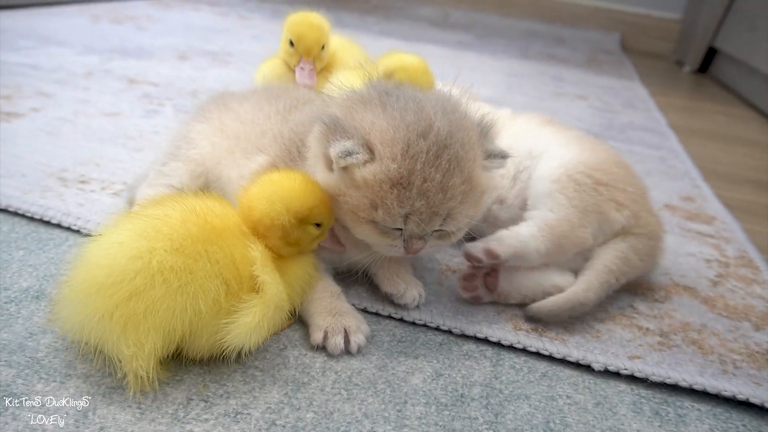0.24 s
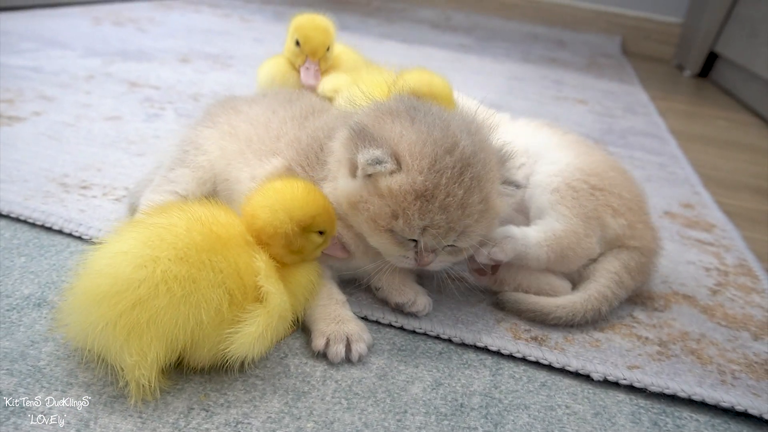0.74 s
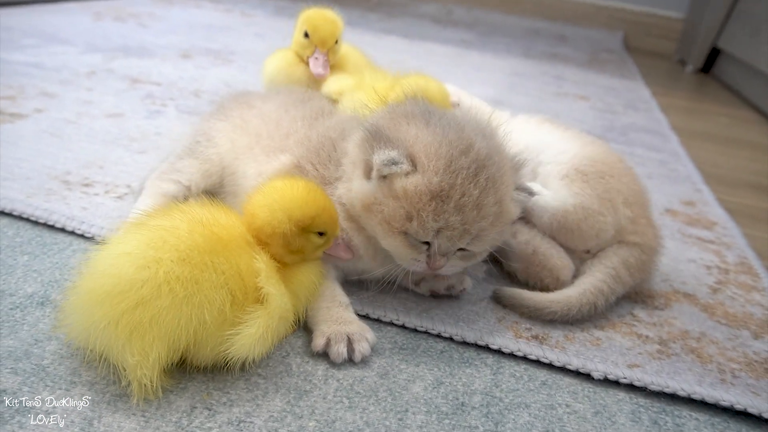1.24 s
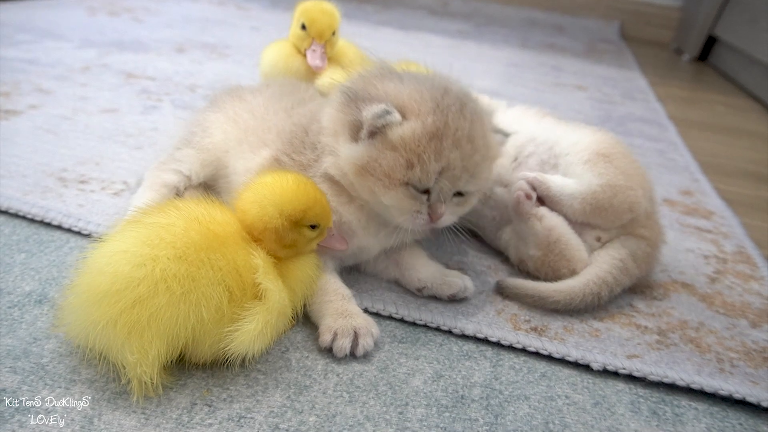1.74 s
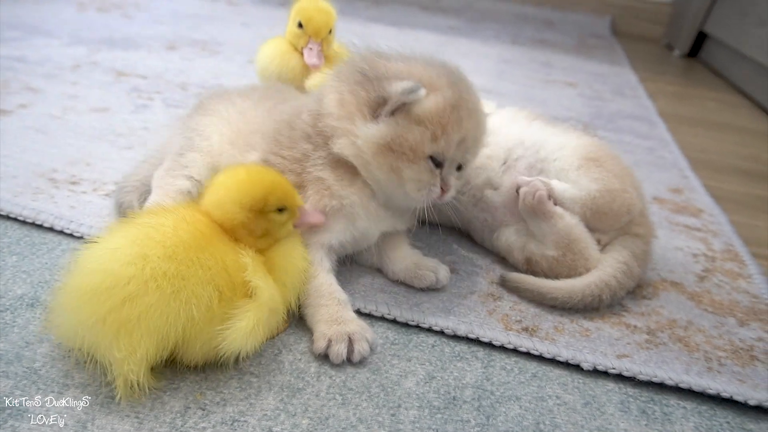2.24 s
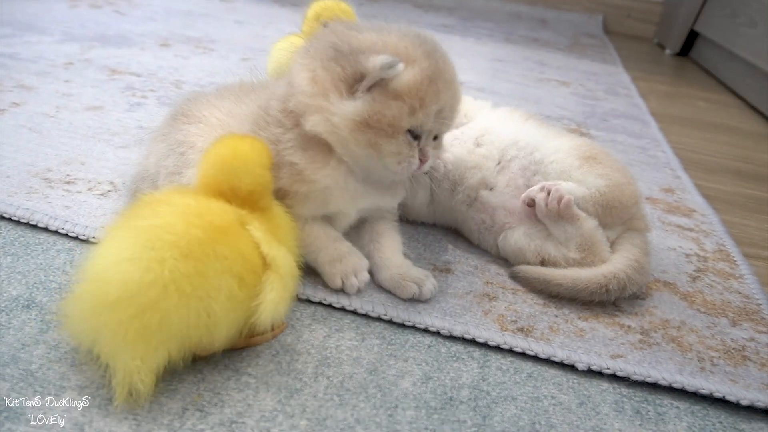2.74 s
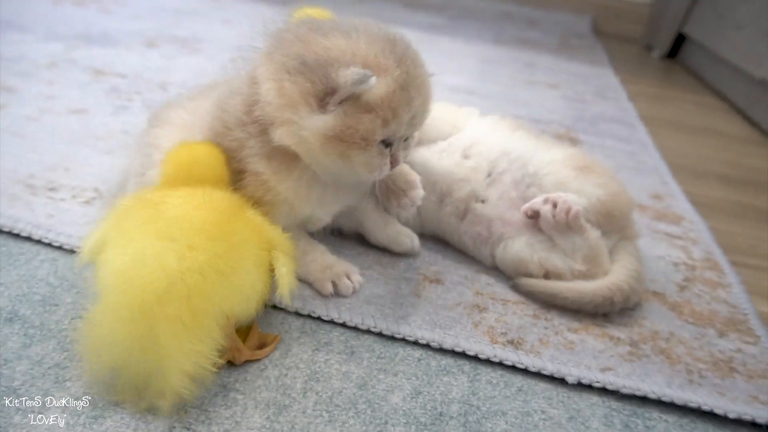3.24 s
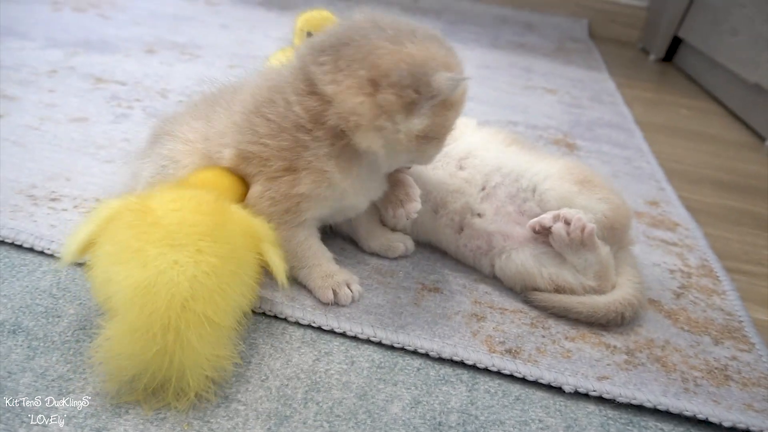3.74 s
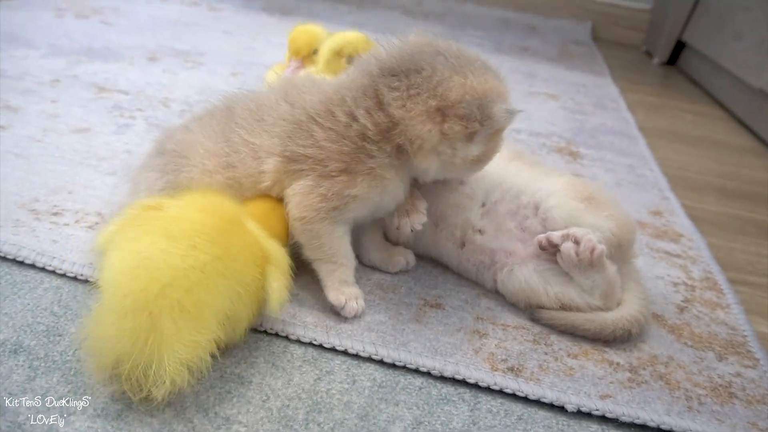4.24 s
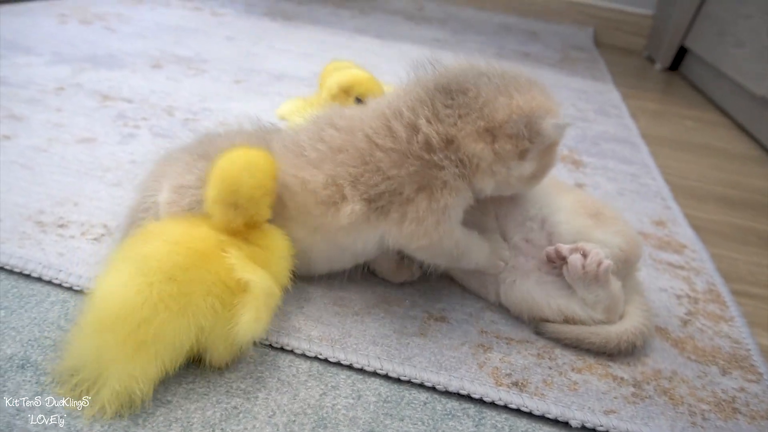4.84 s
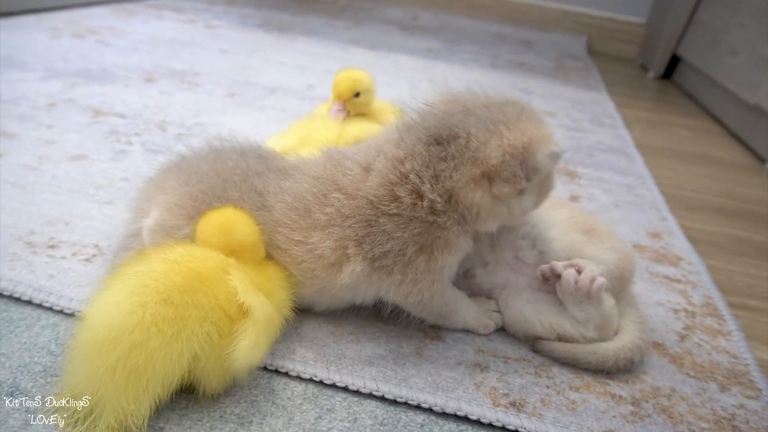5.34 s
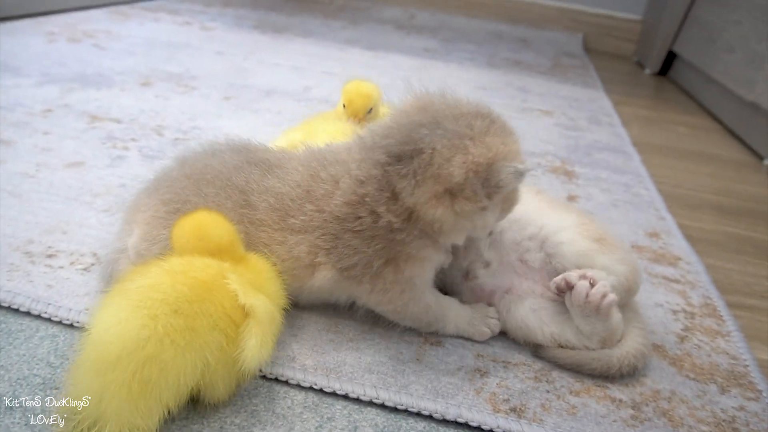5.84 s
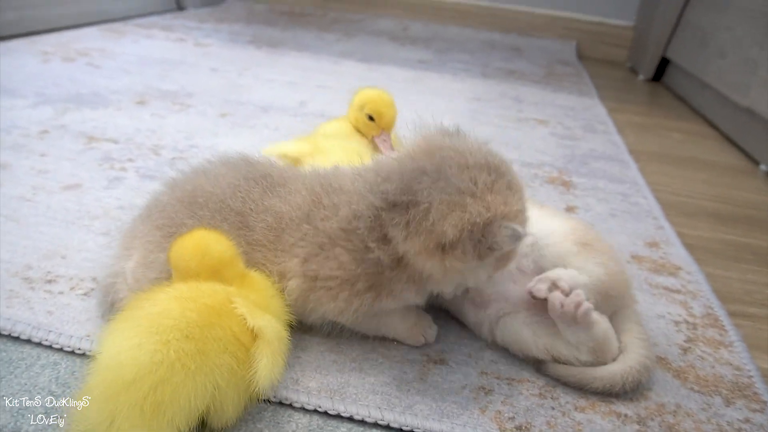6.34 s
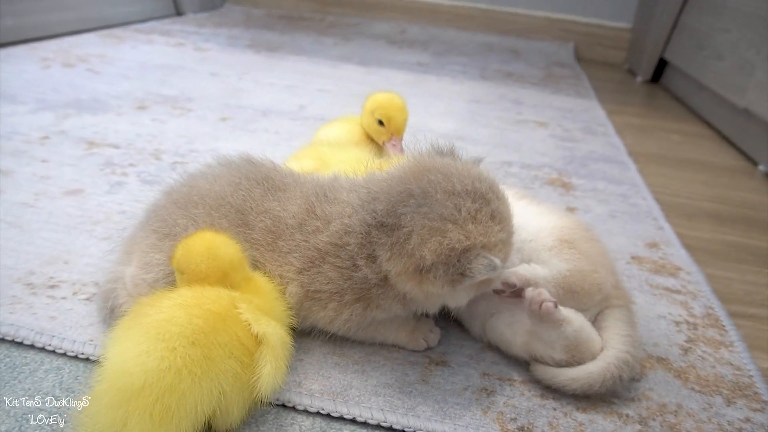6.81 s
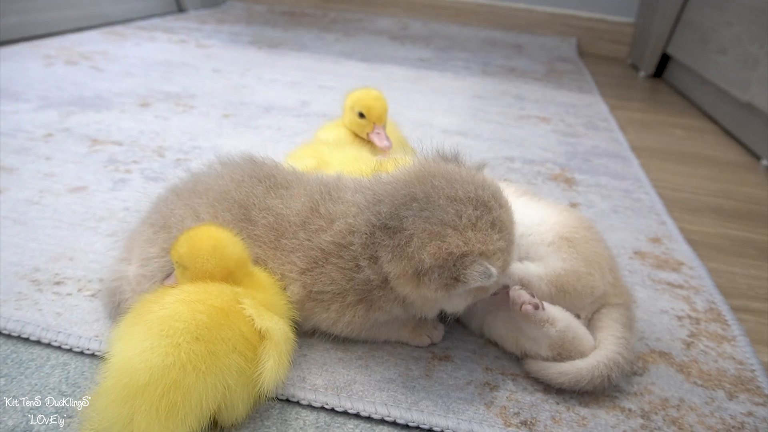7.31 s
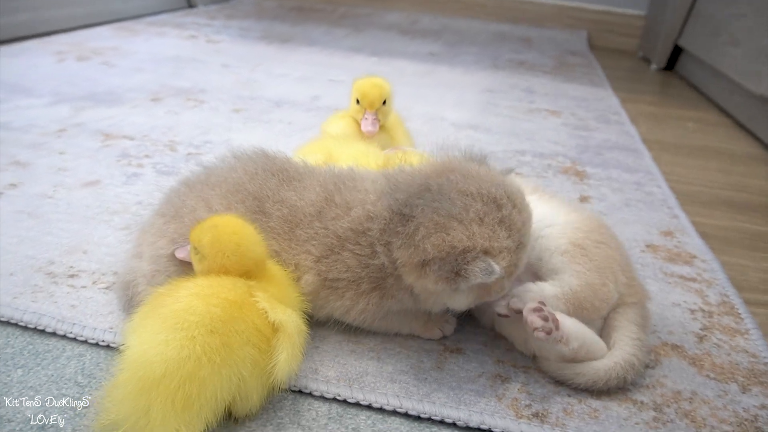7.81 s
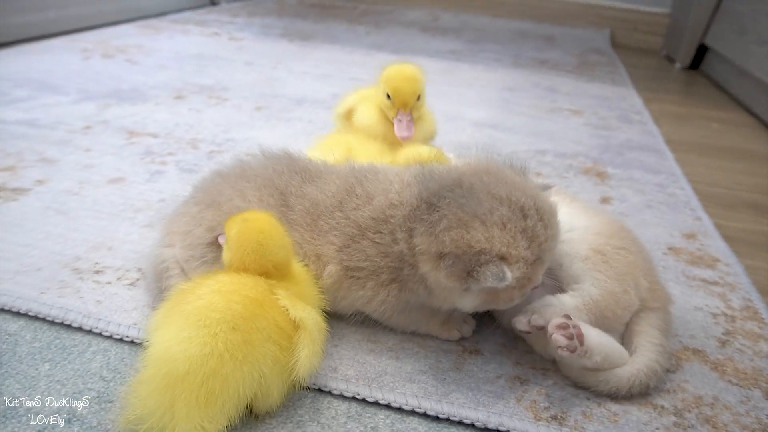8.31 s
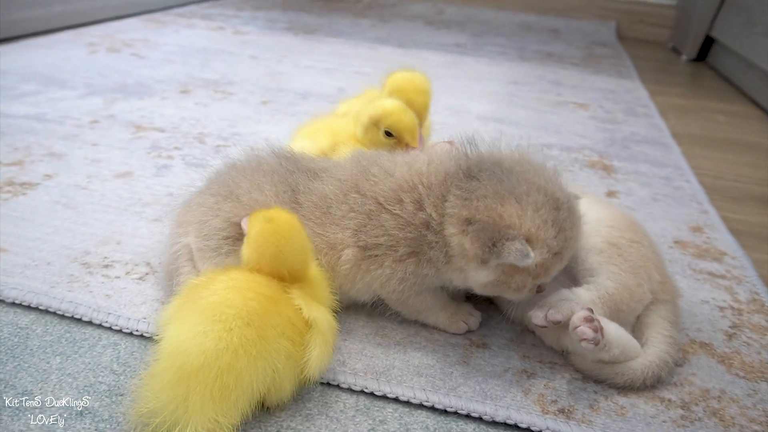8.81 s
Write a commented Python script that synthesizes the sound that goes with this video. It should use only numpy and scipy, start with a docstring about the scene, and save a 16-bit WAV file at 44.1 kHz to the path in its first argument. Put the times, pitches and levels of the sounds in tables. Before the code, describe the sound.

Close up in a small quiet room, ducklings peep quickly: clear mellow cheeps at a steady pace with smaller pips between them, then a hoarser second bird overlaps and the calls crowd together and get louder. One bird continues alone, stops for about a second, and thin shrill peeps finish. Faint scuffs, soft paw pads and small bill ticks on a rug, with short room reflections and low hum.

```python
"""Ducklings peep in overlapping calls beside two kittens on a rug in a small, quiet room, heard close up.
Each peep is an arched, gliding whistle from the syrinx, roughened by noise and side tones when pushed.
Paws and webbed feet pad and scuff as noise bursts; bills and claws tick; a faint thin whistle comes early.
Early copies and a decaying noise tail answer from the room, over a low hum and a faint hiss."""
import sys
import numpy as np
from scipy import signal
from scipy.fft import rfft, irfft, next_fast_len
from scipy.io import wavfile
from scipy.ndimage import uniform_filter1d, map_coordinates

SR = 44100
rng = np.random.default_rng(int(sys.argv[2]) if len(sys.argv) > 2 else 0)


def persist_wave(psi):
    """Save psi, clipped to +-1, as 16-bit WAV."""
    counts = np.round(np.clip(psi, -1, 1) * 32767).astype(np.int16)
    wavfile.write(sys.argv[1], SR, np.atleast_2d(counts).T)


N = 399974  # samples, about 9 s

# Full peeps, levels before shaping: (time [s], length [s], voice [name], shoulder [Hz], crest [Hz],
# crest position [share of length], whistle level [dB], rasp level [dB])
FULL_PEEPS = [(.135, 0.11, "mellow", 3686, 3930, 0.57, -35.5, -43.5),
              (0.409, 0.091, "mellow", 3560, 3950, 0.88, -33, -45),
              (0.694, 0.12, "mellow", 3550, 3973, 0.56, -34, -44),
              (0.967, .12, "mellow", 3656, 4095, 0.69, -35, -44.5),
              (1.254, 0.1, "mellow", 3590, 4010, 0.86, -35.5, -45),
              (1.542, 0.1, "mellow", 3540, 3924, 0.67, -38, -51.5),
              (1.85, .11, "mellow", 3304, 3820, 0.53, -37.5, -49),
              (2.168, 0.099, "mellow", 3297, 3736, 0.67, -41, -53.5),
              (2.5, 0.1, "mellow", 3274, 3777, 0.58, -40, -49),
              (2.783, 0.11, "mellow", 3435, 3780, 0.65, -37, -46),
              (3.088, .089, "mellow", 3330, 3676, 0.47, -36, -49.5),
              (3.144, 0.1, "hoarse", 2950, 3753, 0.44, -34, -62),
              (3.409, 0.11, "hoarse", 3884, 4485, 0.75, -34, -41.5),
              (3.456, 0.084, "mellow", 3650, 3680, 0.52, -50, -45),
              (3.69, 0.097, "hoarse", 3886, 4490, 0.62, -37.5, -39),
              (3.724, 0.091, "mellow", 3007, 3620, 0.84, -40.5, -50.5),
              (3.958, 0.12, "hoarse", 3885, 4390, 0.47, -39.5, -44.5),
              (4.036, 0.097, "mellow", 3170, 3717, 0.49, -37.5, -52),
              (4.237, 0.087, "hoarse", 3900, 4430, 0.33, -40.5, -40),
              (4.295, 0.091, "mellow", 3536, 3785, 0.57, -34.5, -44.5),
              (4.35, 0.074, "shrill", 4200, 4700, .62, -41.5, -53.5),
              (4.509, 0.11, "hoarse", 3810, 4450, 0.61, -37, -39),
              (4.577, 0.11, "mellow", 3410, 3640, 0.54, -32, -48),
              (4.686, 0.085, "shrill", 4100, 4690, .62, -44.5, -48.5),
              (4.801, 0.1, "hoarse", 3376, 4114, 0.51, -28.5, -43.5),
              (4.892, .092, "mellow", 3556, 3735, 0.63, -35.5, -45.5),
              (5.097, .1, "hoarse", 3606, 4440, 0.64, -29, -42),
              (5.198, .1, "mellow", 3530, 3666, 0.57, -39.5, -48.5),
              (5.402, 0.099, "hoarse", 3940, 4650, 0.76, -33.5, -41.5),
              (5.723, .11, "hoarse", 3680, 4430, 0.72, -33.5, -44),
              (6.048, .1, "hoarse", 3610, 4184, 0.67, -35.5, -49.5),
              (6.369, 0.11, "hoarse", 3615, 4190, 0.7, -34, -50),
              (6.738, 0.1, "hoarse", 3480, 3944, 0.32, -37.5, -55.5),
              (7.945, 0.092, "shrill", 3400, 4580, 0.62, -47, -57),
              (8.227, 0.089, "shrill", 4090, 4590, 0.48, -39.5, -56.5),
              (8.504, 0.092, "shrill", 4060, 4610, 0.41, -39, -50.5),
              (8.769, 0.097, "shrill", 4360, 4940, 0.5, -36, -45.5),
              (9.047, 0.076, "shrill", 3890, 4700, 0.67, -39, -44.5)]
# Short, clean pips: (time [s], length [s], crest [Hz], crest position [share of length], level [dB])
SHORT_PIPS = [(0.469, 0.062, 3790, 0.19, -43), (0.617, 0.066, 3830, .3, -41.5),
              (1.137, 0.049, 2435, 0.1, -38.5), (1.275, 0.052, 2825, 0.234, -40),
              (1.529, 0.074, 2590, 0.12, -43.5), (2.057, 0.055, 2557, .1, -38.5),
              (2.18, 0.071, 3115, 0.34, -39), (2.566, .06, 2773, 0.31, -40),
              (2.63, 0.05, 3080, 0.052, -45.5), (2.713, 0.086, 3135, 0.333, -35.5),
              (2.862, 0.068, 3980, 0.36, -46.5), (7.451, 0.059, 3510, 0.25, -48),
              (7.597, 0.056, 3400, 0.4, -49.5), (8.862, 0.076, 3316, 0.14, -38)]
PIP_SHOULDER, PIP_RASP_DB = .93, -28  # shoulder [share of the crest]; rasp relative to the pip's level [dB]
# Spectrum of the rasp's noise: (frequency [Hz], relative level [dB])
RASP_SPECTRUM = [(300, -54), (600, -15), (900, -1), (1300, 1.5), (1900, 3), (2700, 4.5), (4500, 3),
                 (5600, -0.5), (7000, -2.5), (8600, -9.5), (11000, -10.5), (15500, -27)]
# Left minus right for all the birds: (frequency [Hz], difference [dB])
STEREO_LEAN = [(2000, 0.5), (3400, 0), (4400, 2.5), (6000, 4.5), (8000, -0.5), (12000, -3.5)]
LAG_PER_DB = 3e-6  # how much sooner the louder side hears a call [s per dB of left-right difference]


def ducklings():
    """All the calls; each reaches the side its voice is panned to louder and a little sooner."""
    out = np.zeros((2, N))
    spray = patchy(noise(RASP_SPECTRUM), patchy_db=4.5)
    pips = [(s, length, "soft", PIP_SHOULDER * crest_hz, crest_hz, crest_at, db, db + PIP_RASP_DB)
            for s, length, crest_hz, crest_at, db in SHORT_PIPS]
    for row in FULL_PEEPS + pips:
        s, pan_db = row[0], VOICE_TYPES[row[2]]["pan_db"]
        call = peep(row, np.roll(spray, -round(s * SR)))
        sides_db = np.array([[pan_db / 2], [-pan_db / 2]])

        def placement(hz):
            return amp(sides_db) * np.exp(2j * np.pi * hz * LAG_PER_DB * sides_db)

        add(out, s, filtered(reflections(call), placement))
    return filtered(out, lambda hz: amp(along(STEREO_LEAN, hz) * np.array([[.5], [-.5]])))


# How each type of call is sung, by name:
# scoop [share flat at the start], rise_s [s], sag [share], climb and fall [curve exponents], end_hz [Hz],
# jitter [share of pitch], swell_db [dB, middle against ends], tilt_db [dB, start to end],
# rasp_at [share of length, where rasp peaks], octave_db [dB], third_db [dB relative to the octave],
# twin_ratio [pitch ratio] and twin_db [dB over the rasp] of the syrinx's other side, pan_db [dB, left minus right]
VOICE_TYPES = { "mellow": dict(scoop=.24, rise_s=0.00601, sag=0.01225, climb=7.8, fall=1.2, end_hz=2208, jitter=0.0162, swell_db=1.4, tilt_db=-0.5, rasp_at=0.44, octave_db=-18, third_db=-1, twin_ratio=1, twin_db=7.5, pan_db=-3),
               "hoarse": dict(scoop=0.24, rise_s=.008, sag=0.0047, climb=2.1, fall=.85, end_hz=2350, jitter=0.01645, swell_db=3, tilt_db=-4, rasp_at=0.52, octave_db=-21, third_db=-3, twin_ratio=1, twin_db=-12.5, pan_db=4),
               "shrill": dict(scoop=0.32, rise_s=0.0089, sag=0.0026, climb=1.1, fall=1.5, end_hz=2780, jitter=0.0263, swell_db=-3.5, tilt_db=0, rasp_at=0.66, octave_db=-10.5, third_db=-11, twin_ratio=0.92, twin_db=11, pan_db=-2.2),
               "soft": dict(scoop=0.11, rise_s=0.00518, sag=0.0042, climb=2.16, fall=3.1, end_hz=2057, jitter=0.015, swell_db=0, tilt_db=-6, rasp_at=0.38, octave_db=-22.5, third_db=-9.5, twin_ratio=.99, twin_db=17.5, pan_db=0.5)}
# Soft start, then the voice catches: (position [share of length], level [dB])
CALL_SWELL = [(0, -10), (.1, -13), (.18, -1.5), (.85, 0), (1, -1)]
# Rise and fall of the rasp: (position from its peak [share of length], level [dB])
RASP_ENVELOPE = [(-.6, -17), (-.32, -14), (-.15, -3.5), (.1, -3), (.3, -7), (.55, -28.5)]
# What the bill does to the overtones: (frequency [Hz], gain [dB])
BILL_RESPONSE = [(4200, 1), (5000, 5.5), (6000, -1.5), (7200, -3), (8600, -1), (9800, -4), (11000, -6.5),
                 (12500, -9), (15500, -1)]
# How well the throat carries each pitch: (frequency [Hz], gain [dB])
THROAT_RESPONSE = [(2000, -21.5), (2200, -5.5), (2450, 0), (3000, -2), (3700, -0.5), (4200, -5.5),
                   (4600, 0.5), (5000, -37)]


def peep(row, hiss, rasp_jitter=0.017, flutter_db=3, dull_db=-5, fourth_db=-13,
         attack=0.0019, release=0.003, whistle_db=-0.96, spray_db=-1.5,
         beat_db=-8, beat_hz=950, beat_waver=0.1985, grain_db=1.5, give_way_db=-10.0,
         twin_octave_db=-17, shake_db=-3, twin_waver=0.046):
    """One call: a gliding whistle with weak overtones; pushed, the membranes beat and spray noise around it."""
    _, length, name, shoulder_hz, crest_hz, crest_at, level, rasp = row
    voice = VOICE_TYPES[name]
    n = int(length * SR)
    t = np.arange(n) / SR
    u = t / length  # share of the length
    gate = np.clip(t / attack, 0, 1) * np.clip((length - t) / release, 0, 1)
    effort = level + np.interp(u, *np.transpose(CALL_SWELL))
    effort = effort - voice["swell_db"] * np.cos(2 * np.pi * u) + voice["tilt_db"] * (u - .5)
    chaos = amp(rasp + np.interp(u - voice["rasp_at"], *np.transpose(RASP_ENVELOPE)))
    rough = np.clip(chaos / amp(level), 0, 1)

    # the clean whistle gives way as the rasp takes over
    loud = amp(effort + whistle_db + give_way_db * rough + flutter_db * wobble(n, 251.8))
    pitch = arch(t, shoulder_hz, crest_hz, crest_at, voice)
    unsteady = voice["jitter"] * wobble(n, 142.4) + rasp_jitter * rough * wobble(n, 890)
    hz = pitch * (1 + unsteady)
    phase = 2 * np.pi * np.cumsum(hz) / SR

    # overtones fade at both ends, where the push is weak
    bright_db = voice["octave_db"] + dull_db * (2 * u - 1) ** 2
    harmonics_db = [0, voice["third_db"], voice["third_db"] + fourth_db]
    overtones = sum(amp(bright_db + db + along(BILL_RESPONSE, k * hz)) * np.sin(k * phase)
                    for k, db in enumerate(harmonics_db, 2))

    # irregular cycles shake the whistle and blur its line
    shake = chaos * amp(shake_db) * wobble(n, 1800)
    fundamental = amp(along(THROAT_RESPONSE, pitch)) * np.sin(phase)
    tone = np.sqrt(2) * (loud + shake) * (fundamental + overtones)

    # the other side of the syrinx slips out of tune and splits the note
    twin_hz = hz * (voice["twin_ratio"] + twin_waver * wobble(n, 119.7))
    other = 2 * np.pi * np.cumsum(twin_hz) / SR
    twin = amp(voice["twin_db"]) * (np.sin(other) + amp(twin_octave_db) * np.sin(2 * other))

    # a slower, unsteady motion of the membranes chops the whistle into side strands
    slow_hz = beat_hz * np.exp(.3 * rng.normal() + beat_waver * wobble(n, 251.8))
    slow = 2 * np.pi * np.cumsum(slow_hz) / SR
    carrier = 2 * np.sin(phase) + .5 * np.sin(2 * phase) + 0.14
    strands = amp(beat_db + 7.3 * wobble(n, 103)) * np.cos(slow) * carrier

    spray = amp(spray_db + grain_db * wobble(n, 588.5)) * hiss[:n]
    return gate * (tone + chaos * (twin + strands + spray))


def arch(t, shoulder_hz, crest_hz, crest_at, voice, glide=0.0084):
    """A call's pitch: it scoops up to a shoulder, climbs to its crest and falls as the push ends."""
    u = t / t[-1]
    top = np.clip(crest_at, .02, .95)
    lift = np.abs(np.sin(np.pi / 2 * u / top)) ** voice["climb"]
    climb = shoulder_hz + (crest_hz - shoulder_hz) * lift
    climb = climb * (1 - voice["sag"] * np.sin(np.pi * u / top) ** 2)
    drop = np.abs(np.cos(np.pi / 2 * (u - top) / (1 - top))) ** voice["fall"]
    fall = voice["end_hz"] + (crest_hz - voice["end_hz"]) * drop
    scoop = 1 - voice["scoop"] * np.exp(-t / voice["rise_s"])
    # glide [s] rounds off the corners
    return uniform_filter1d(scoop * np.where(u < top, climb, fall), int(glide * SR) + 1, mode="nearest")


def patchy(x, patchy_db):
    """Break a noise into short strands of random strength."""
    z = signal.stft(x, nperseg=256)[2]
    field = rng.standard_normal(z.shape)
    field = uniform_filter1d(uniform_filter1d(field, 3, 0), 4, 1)
    strands = signal.istft(z * amp(patchy_db * unit(field)), nperseg=256)[1]
    return unit(strands[:len(x)])


def reflections(call, echo_db=-12, first=.002, last=0.015, count=8):
    """Floor and furniture return weak copies, by new paths for each call as the bird moves and turns."""
    out = np.zeros((2, len(call) + SR // 10))
    add(out, 0, call)
    for delay, size, skew in rng.random((count, 3)):
        when = first + last * delay
        copy = amp(echo_db) * (size * 2 - 1) * call
        add(out[0], when, copy)
        add(out[1], abs(when + (skew - .5) * .0004), copy)  # up to 0.2 ms apart between the sides
    return out


# Sharp ticks of bills and claws: (time [s], level before gain [dB])
TICK_HITS = [(1.0081, -18.5), (1.918, -35), (3.4005, -14), (4.2412, -28), (7.1661, -69), (7.617, -34),
             (8.7849, -44)]
# Bright spectrum of a tick: (frequency [Hz], relative level [dB])
TICK_SPECTRUM = [(200, -22), (1200, 14), (3500, 10), (8000, 15), (15000, 5)]


def ticks():
    """Bills and claws tap: bright noise bursts with the sharpest onset."""
    return contacts(TICK_HITS, TICK_SPECTRUM, attack=0.00025, t60=0.047, gain_db=-25.5)


# Scuffs on the rug: (time [s], level before gain [dB])
SCUFF_HITS = [(0.1082, -44.5), (1.723, -37), (1.7377, -58), (1.804, -43.5), (1.821, -46.5), (2.0094, -45),
              (2.949, -48), (3.021, -40.5), (3.0442, -47.5), (3.0642, -45), (3.309, -39.5), (3.9305, -43.5),
              (4.47, -44), (8.173, -56)]
# Mid-heavy spectrum of a scuff: (frequency [Hz], relative level [dB])
SCUFF_SPECTRUM = [(150, -14), (700, 10.5), (3000, 11.5), (5000, 3), (9000, -9), (15000, -17)]


def scuffs():
    """Feet rub the rug: mid-heavy noise bursts with a longer decay."""
    return contacts(SCUFF_HITS, SCUFF_SPECTRUM, attack=0.00072, t60=0.12, gain_db=-12.5)


# Soft footfalls: (time [s], level before gain [dB])
STEP_HITS = [(3.044, -43.5), (3.4, -55), (4.018, -45), (4.438, -44.5), (4.499, -45), (5.213, -49),
             (5.388, -42.5), (7.235, -51), (8.172, -45), (8.205, -41)]
# Low spectrum of a footfall: (frequency [Hz], relative level [dB])
STEP_SPECTRUM = [(40, -18), (100, 1), (170, 8), (350, -6), (800, -13), (2000, -30)]


def footfalls():
    """Paws and webbed feet pad on the rug: low, short noise bursts."""
    return contacts(STEP_HITS, STEP_SPECTRUM, attack=0.00093, t60=0.066, gain_db=-5.5)


def contacts(rows, colour, attack, t60, gain_db):
    """Contacts that do not ring: a burst of noise each, dying quickly (attack and t60 in s)."""
    envelope = np.zeros(N)
    t = np.arange(SR // 3) / SR
    for s, db in rows:
        decay = amp(db + gain_db - 60 * t / t60)
        add(envelope, s, decay * (1 - np.exp(-t / attack)))
    return envelope * noise(colour)


# A faint thin whistle: (time [s], frequency [Hz], level [dB])
WHISTLE_LINE = [(.38, 5000, -72), (.48, 4700, -66), (.54, 4630, -57), (.62, 4770, -53), (.68, 4900, -64),
                (.78, 4950, -78), (.8, 6450, -76), (1.05, 6620, -64), (1.22, 6450, -72)]


def thin_whistle(waver=0.0062):
    """A faint, wavering high sine that swells, fades, jumps up once, swells again and ends."""
    hz, db = curves(WHISTLE_LINE)
    t = np.arange(N) / SR
    sounding = (t > WHISTLE_LINE[0][0]) & (t < WHISTLE_LINE[-1][0])
    phase = 2 * np.pi * np.cumsum(hz * (1 + waver * wobble(N, 280))) / SR
    return sounding * amp(db) * np.sin(phase)


# How quickly the room dies away: (frequency [Hz], decay time t60 [s])
WALL_DECAY = [(200, 0.53), (2000, 0.31), (4500, 0.25), (12000, 0.16)]


def walls(x, gap=0.0055):
    """The room's diffuse answer after a gap [s]: a noise tail whose frequencies die at their own speed."""
    hz, t, z = signal.stft(rng.standard_normal((2, SR // 2)), SR, nperseg=256)
    decay = amp(-60 * t / along(WALL_DECAY, hz)[:, None])
    tail = signal.istft(z * decay, SR, nperseg=256)[1]
    late = np.pad(x, (round(gap * SR), 0))
    return signal.fftconvolve(late[None], tail / np.linalg.norm(tail[0]), axes=1)[:, :N]


# Spectrum of the room's hum: (frequency [Hz], relative level [dB])
HUM_SPECTRUM = [(15, -55.5), (25, -35), (37, -7), (59, -3.5), (81, -0.5), (94, 6.5), (108, -10.5), (134, 2),
                (151, -6.5), (168, -13.5), (193, -9), (237, -9.5), (336, -19), (373, -17), (400, -25),
                (520, -56), (880, -120)]
# Spectrum of the room's hiss: (frequency [Hz], relative level [dB])
AIR_SPECTRUM = [(180, -9), (300, -10), (404, -8), (424, -8.5), (461, -8.5), (553, -3.5), (641, -6.5),
                (1220, -14), (1970, -14.5), (2100, -14.5), (6050, -21.5), (8560, -22), (15500, -25.5)]
# How alike the two sides are: (frequency [Hz], left-right likeness [0 to 1])
SIDE_LIKENESS = [(60, 0.99), (130, 0.98), (260, 0.53), (600, 0.033), (3000, 0.033), (12000, 0.21)]
HUM_DB, AIR_DB = -60, -63.5  # levels of the hum and the hiss [dB]


def room_tone():
    """A low hum, alike on both sides, under a faint, wider hiss: two shaped noises."""
    return amp(HUM_DB) * wide(HUM_SPECTRUM) + amp(AIR_DB) * wide(AIR_SPECTRUM)


def wide(colour):
    """Stereo noise: independent mid and side noises, balanced to set the left-right likeness."""
    def turn(hz):
        return np.arccos(np.clip(along(SIDE_LIKENESS, hz), -1, 1)) / 2

    mid = filtered(noise(colour), lambda hz: np.cos(turn(hz)))
    side = filtered(noise(colour), lambda hz: np.sin(turn(hz)))
    return np.array([mid + side, mid - side])


def amp(db):
    """Decibels to gain."""
    return 10 ** (np.asarray(db) / 20)


def unit(x):
    """Scale to rms 1."""
    return x / np.sqrt(np.mean(x ** 2) + 1e-20)


def along(points, hz):
    """(frequency [Hz], value) points read on a log frequency axis."""
    f, v = np.transpose(points)
    return np.interp(np.log(hz + 1), np.log(f + 1), v)


def curves(rows):
    """One value per sample for each column after the time."""
    s, *cols = np.transpose(rows)
    return [np.interp(np.arange(N) / SR, s, c) for c in cols]


def wobble(n, rate):
    """A smooth random curve of n samples, rate knots a second."""
    return map_coordinates(rng.standard_normal(2048), [np.arange(n) * rate / SR], mode="mirror")


def filtered(x, response):
    """x with its spectrum multiplied by a response of frequency."""
    n = x.shape[-1]
    m = next_fast_len(n + 4096)
    return irfft(rfft(x, m) * response(np.fft.rfftfreq(m, 1 / SR)), m)[..., :n]


def noise(colour):
    """Noise of rms 1 shaped by (frequency [Hz], relative level [dB]) points."""
    return unit(filtered(rng.standard_normal(N), lambda hz: amp(along(colour, hz))))


def add(track, s, sound):
    """Mix a sound into a track at a time [s]."""
    part = track[..., round(s * SR):][..., :sound.shape[-1]]
    part += sound[..., :part.shape[-1]]


def scene(wet_db=-9):
    """The animals, the thin whistle, the room's answer and its quiet background."""
    movement = ticks() + scuffs() + footfalls()
    near = ducklings() + movement + thin_whistle()
    return near + amp(wet_db) * walls(near.mean(axis=0)) + room_tone()


TOP_HZ = 15800  # upper band limit [Hz]


def record(dry):
    """A steep band limit: nothing passes from TOP_HZ up."""
    return filtered(dry, lambda hz: hz < TOP_HZ)


dry = scene()
out = record(dry)
persist_wave(out)
```